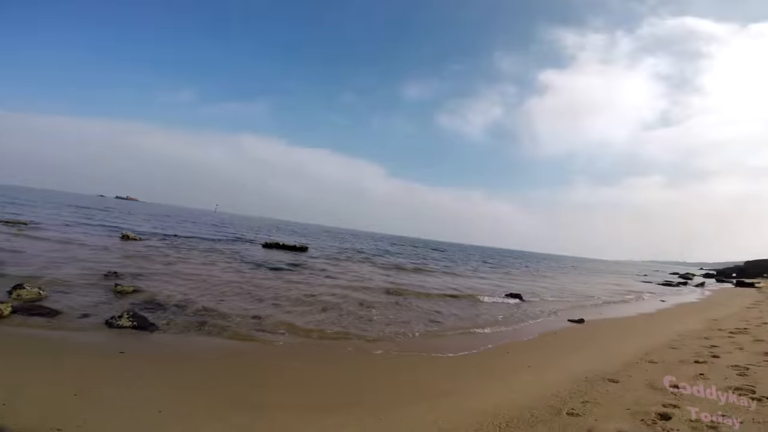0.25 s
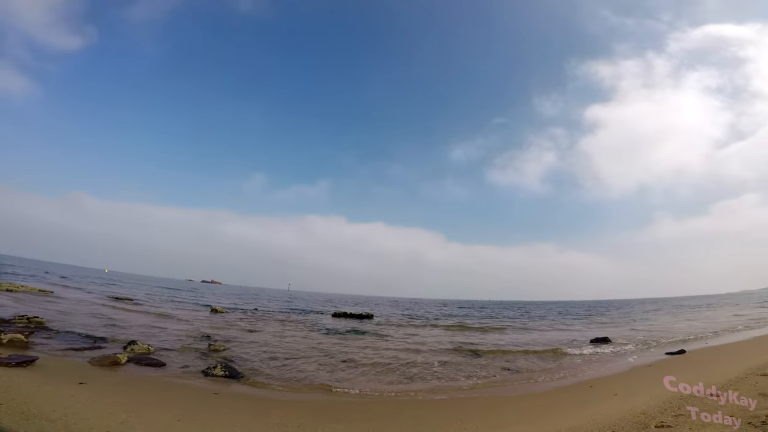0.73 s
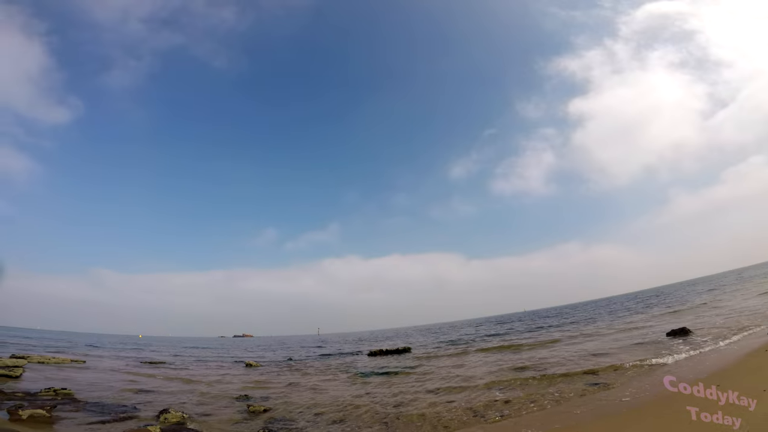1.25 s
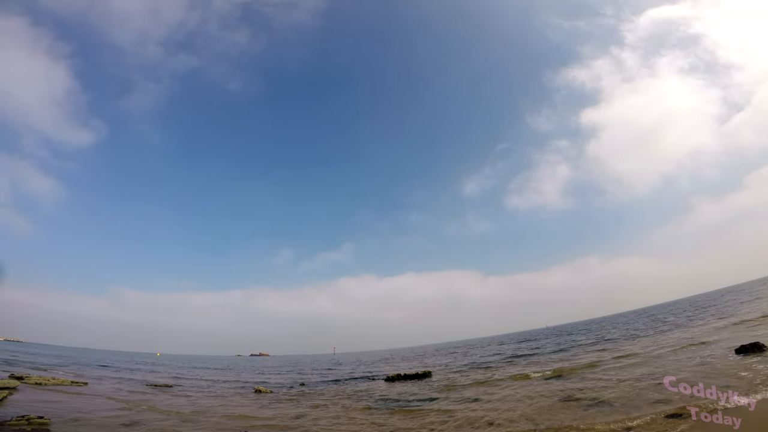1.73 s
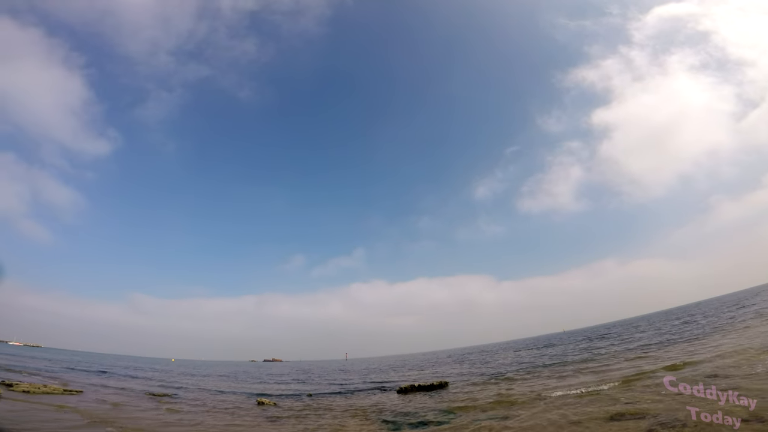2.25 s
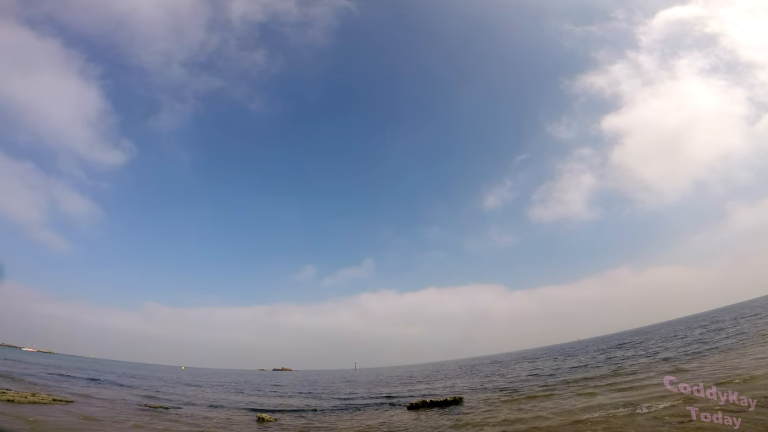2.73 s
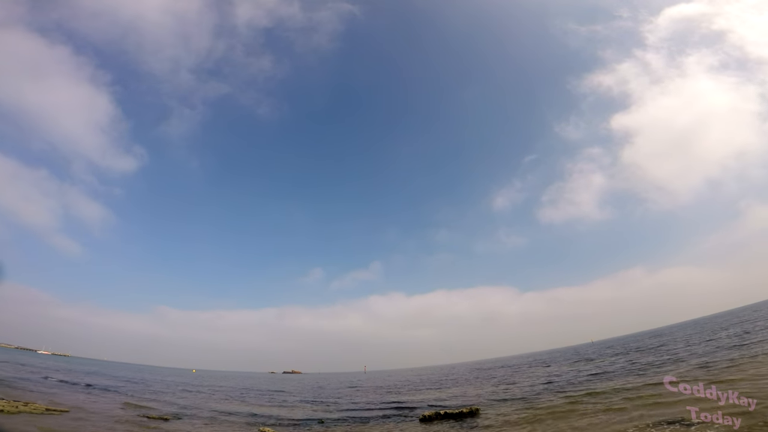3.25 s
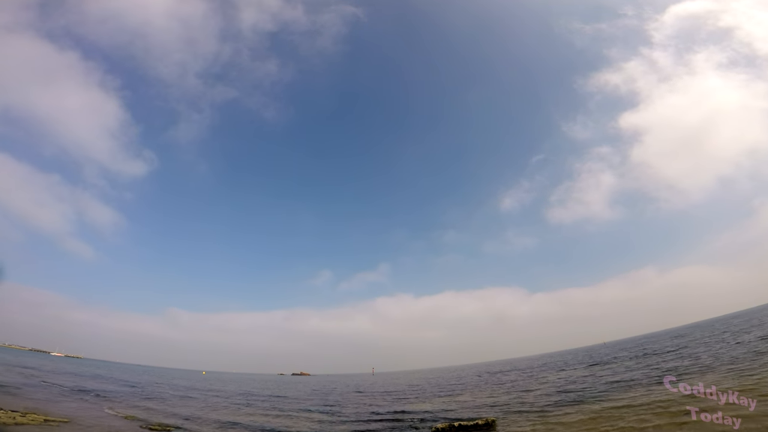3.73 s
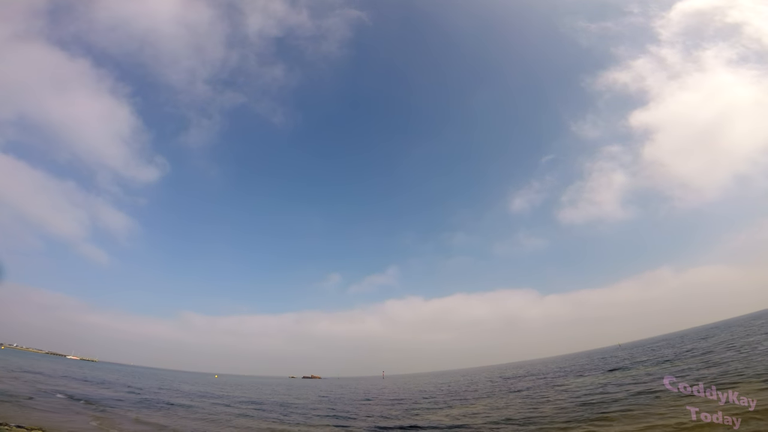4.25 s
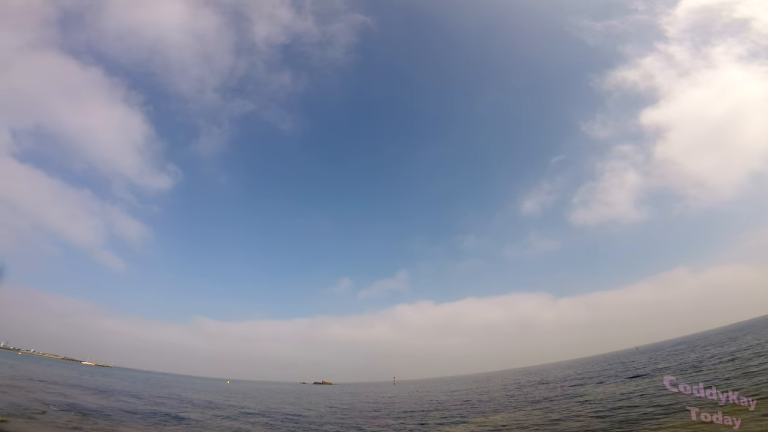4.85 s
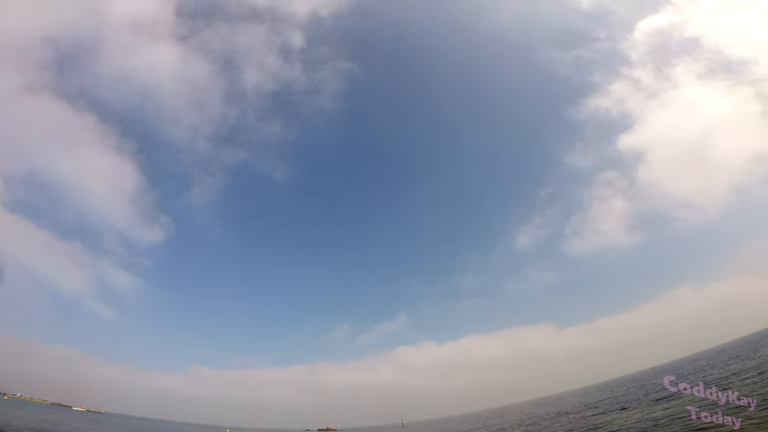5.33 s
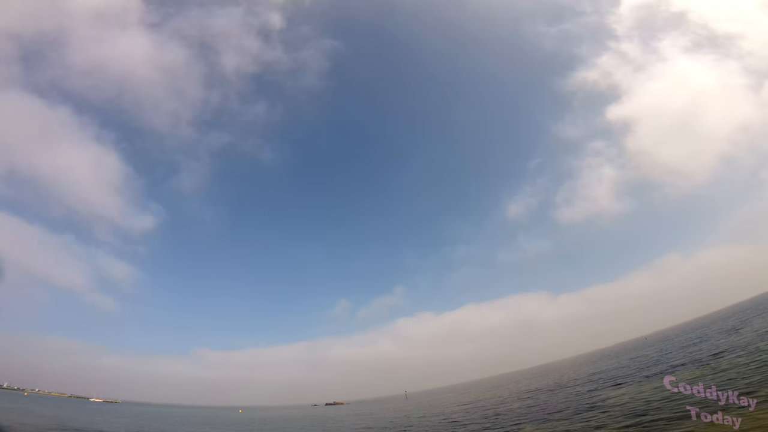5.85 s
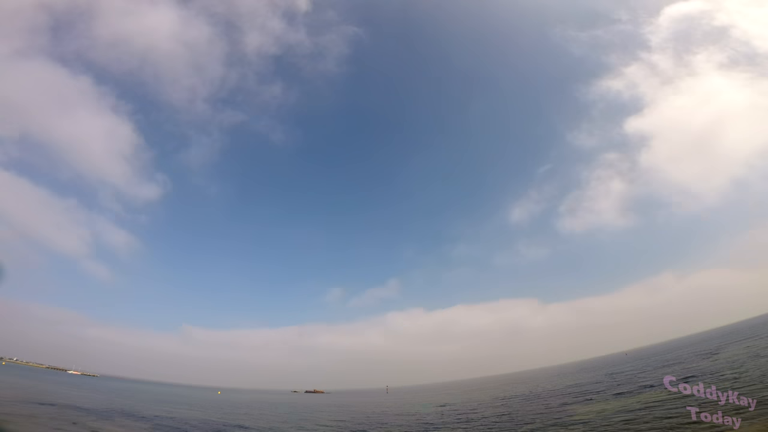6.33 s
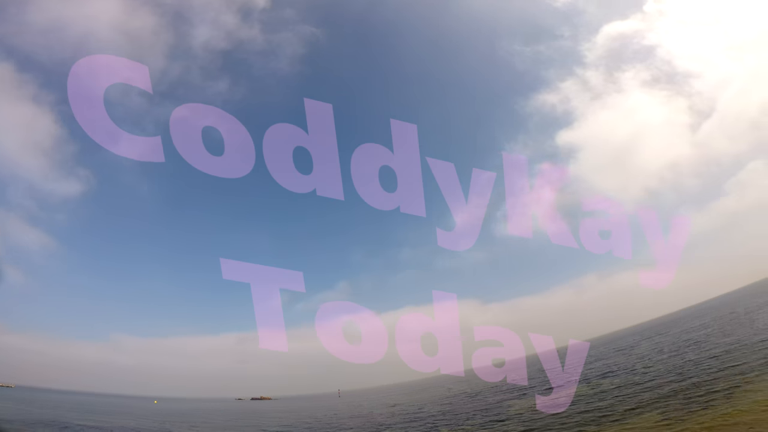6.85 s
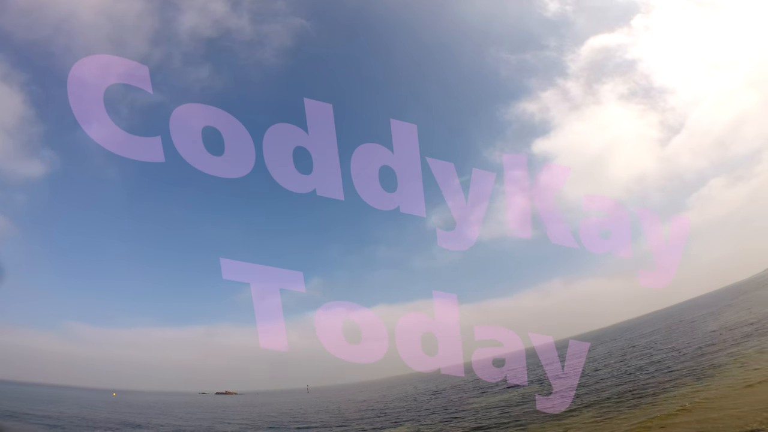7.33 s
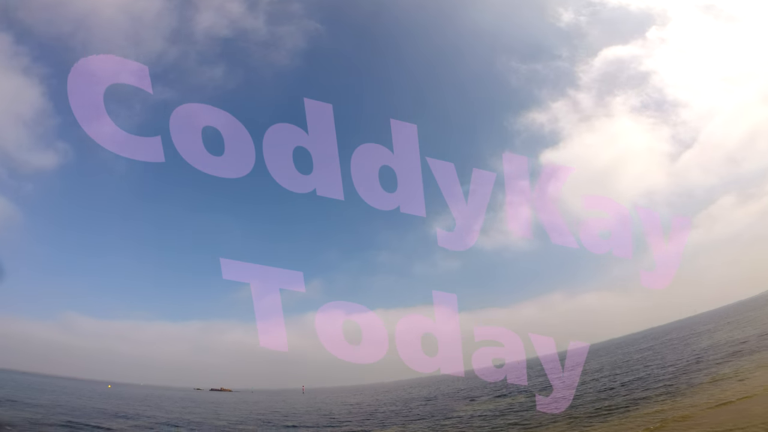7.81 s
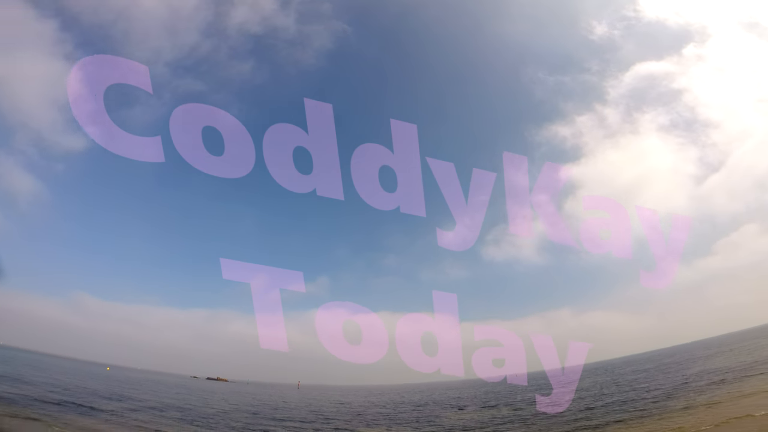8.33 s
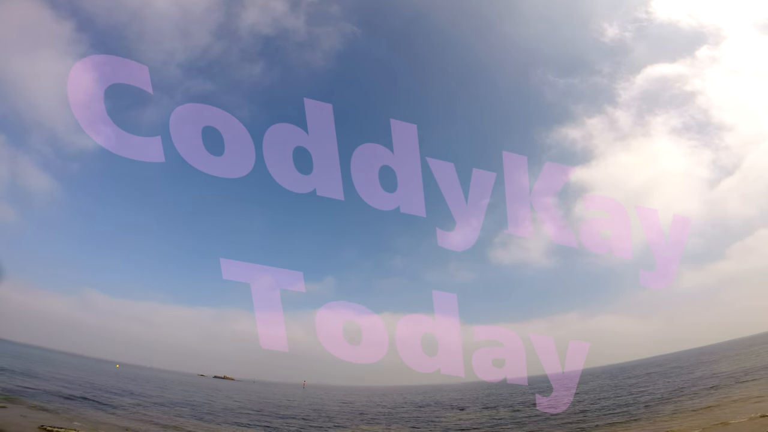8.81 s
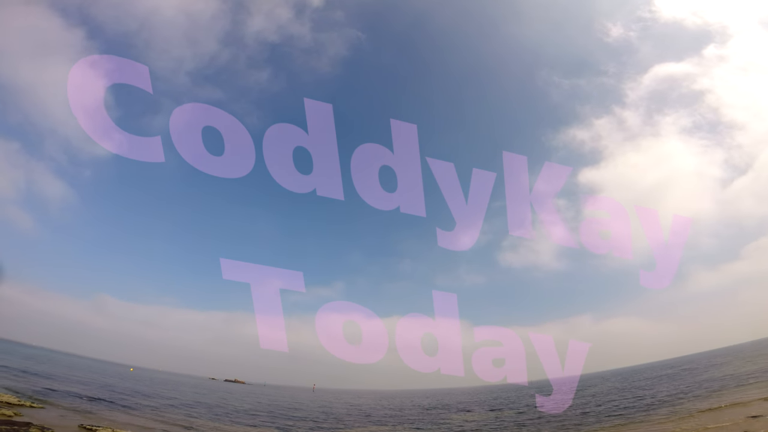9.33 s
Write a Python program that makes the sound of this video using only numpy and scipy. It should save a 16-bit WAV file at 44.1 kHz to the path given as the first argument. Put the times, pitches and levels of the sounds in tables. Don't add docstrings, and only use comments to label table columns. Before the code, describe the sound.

A small drone heard from a microphone fixed on its own frame outdoors. Four slightly detuned motors make a rough, beating low buzz with hissing propeller tips. An early deep pitch dip, then unsteady cruising, a sudden quick rev upward just past halfway, more brief dips, and a louder, windier finish with low buffeting and rattle.

```python
import sys
import numpy as np
from scipy import signal
from scipy.fft import rfft, irfft, next_fast_len
from scipy.io import wavfile
from scipy.ndimage import uniform_filter1d, map_coordinates

SR = 44100
rng = np.random.default_rng(int(sys.argv[2]) if len(sys.argv) > 2 else 0)


def output_pcm(signal):
    pcm = np.clip(np.atleast_2d(signal).T, -1, 1) * 32767
    wavfile.write(sys.argv[1], SR, np.round(pcm).astype(np.int16))


def amplitude_ratio(level_db):
    exponent = np.asarray(level_db, float) / 20
    return 10 ** exponent


N = 422478

# time in seconds, level of motors 1-4 in dB.
SHAKE = [(0, -32, -33, -47, -52), (.3, -40, -39, -46, -48), (.6, -26, -38, -44, -35),
         (2.1, -24, -38, -38, -27.5), (2.45, -20, -43, -42, -29), (3.3, -21.5, -29, -34, -30),
         (4.2, -22, -25, -30, -22.5), (5.2, -24, -25, -25, -23), (5.65, -29, -22, -23, -25),
         (6.1, -29, -28, -24, -28), (6.6, -17, -30, -26, -33), (7.05, -19, -19, -30, -38),
         (7.4, -23, -14, -24, -30), (7.8, -27, -15.5, -23, -26), (8.2, -27, -22.5, -20, -22),
         (8.9, -36, -17.5, -15, -29.5), (9.58, -35, -20, -15, -19.5)]
# time in seconds, added speed in Hz.
PUNCH = [(5.225, 0), (5.243, 11), (5.285, 63), (5.318, 98), (5.358, 110), (5.393, 94), (5.465, 25),
         (5.51, 8), (5.56, 0)]


def unit(x):
    return x / np.sqrt(np.mean(x ** 2) + 1e-20)


def curves(rows):
    time_s, *columns = np.transpose(rows)
    return np.array([np.interp(np.arange(N) / SR, time_s, column) for column in columns])


def wobble(rate_hz):
    step = np.arange(0, N + 64, 64)
    knots = rng.standard_normal(int(N * rate_hz / SR) + 4)
    coarse = map_coordinates(knots, [step * rate_hz / SR])
    return np.interp(np.arange(N), step, coarse)


def along(spectrum, hz):
    f, db = np.transpose(spectrum)
    return np.interp(np.log(hz + 1), np.log(f + 1), db, left=-120, right=-120)


def coloured(x, spectrum):
    size = next_fast_len(N + 8192)
    gain = amplitude_ratio(along(spectrum, np.fft.rfftfreq(size, 1 / SR)))
    return unit(irfft(rfft(x, size) * gain, size)[:N])


def airflow(buffet_db, wash_db, whoosh_db):
    # frequency in Hz, density in dB per Hz.
    buffet_spectrum = [(8.8, -38), (15, -9), (64, -1), (97, -1.5), (130, -6.5), (170, -29), (290, -120)]
    wash_spectrum = [(170, -23), (240, 0), (310, -5), (400, -0.5), (520, 2), (800, -51)]
    whoosh_spectrum = [(350, -36), (550, 3.5), (820, -2.5), (1090, 1.5), (1300, -4.5), (1650, -4),
                       (2300, -8.5), (3500, -16)]
    buffet = amplitude_ratio(buffet_db + 2.2 * wobble(8.4)) * coloured(rng.standard_normal(N), buffet_spectrum)
    wash = amplitude_ratio(wash_db + 3.5 + 1.5 * wobble(9)) * coloured(rng.standard_normal(N), wash_spectrum)
    whoosh = amplitude_ratio(whoosh_db + 5.0 + 0.6 * wobble(7)) * coloured(rng.standard_normal(N), whoosh_spectrum)
    return buffet + wash + whoosh


def wake():
    # middle in seconds, half length in seconds, level in dB.
    sinkings = [(0.019, 0.11, -35), (0.378, 0.076, -34), (5.62, 0.23, -30.5), (6.72, 0.17, -32),
                (8.14, .1, -34), (8.86, .15, -36), (9.56, .07, -34)]
    # frequency in Hz, density in dB per Hz.
    shudder_spectrum = [(190, -25), (240, -1.5), (285, -1), (330, -6), (400, -11), (470, -35)]
    t = np.arange(N) / SR
    strength = sum(amplitude_ratio(db) * np.exp(-((t - mid_s) / half_s) ** 2) for mid_s, half_s, db in sinkings)
    return strength * amplitude_ratio(1.9 * wobble(14)) * coloured(rng.standard_normal(N), shudder_spectrum)


def rattle():
    # frequency in Hz, density in dB per Hz.
    rattle_spectrum = [(100, -34), (125, -5), (165, 1), (215, -1), (260, -18.5)]
    drive = np.sqrt(np.sum(amplitude_ratio(curves(SHAKE)) ** 2, axis=0))
    return drive * amplitude_ratio(-8.5 + 1.7 * wobble(7.2)) * coloured(rng.standard_normal(N), rattle_spectrum)


def punch():
    added_hz = curves(PUNCH)[0]
    return added_hz / added_hz.max()


def demand():
    # time in seconds, speed of motors 1-4 in Hz.
    cruise_hz = [(0, 219, 203, 175.1, 162.9), (.7, 209.4, 196, 187.7, 178.1), (1.16, 215, 200, 190, 182),
                 (1.35, 201.3, 179.5, 174.1, 167.9), (1.7, 204, 177, 175.1, 165.6),
                 (2.42, 208.9, 186.2, 176.9, 169.8), (3.7, 200.2, 183.9, 183, 169.8),
                 (4.72, 197.4, 187.8, 181.2, 173.8), (4.8, 182.9, 175.1, 168.1, 160.5),
                 (5.22, 182, 174, 166.8, 162), (5.55, 173.5, 171.7, 163, 160.5),
                 (6.2, 170, 181.8, 166.1, 164.2), (6.8, 174.6, 179.7, 174.8, 163.2),
                 (7.16, 182, 186.4, 178.1, 166), (7.4, 189, 200.4, 188, 181),
                 (7.8, 189.5, 202.5, 188.6, 182.1), (8.65, 182, 194.2, 187, 168.5),
                 (9.58, 179.8, 195.3, 183.6, 168)]
    # middle in seconds, half length in seconds, drop in Hz,
    # extra drop per step from motor 4 to 1 in Hz, squareness exponent.
    eases = [
        (.35, .2, 36, 13, 1.8),
        (2.052, .23, 13, 0.27, 2.93),
        (6.51, .2, 17.5, -0.6, 5.93),
        (7.322, 0.071, -6, -0.5, 2.2),
        (8.28, .21, 15, -0.03, 2.4),
        (8.561, 0.0599, -3, 0.37, 2.4),
        (8.92, .13, -4, -0.5, 2.1),
    ]
    t = np.arange(N) / SR
    motor_step = np.arange(4)[::-1, None] - 3 / 2
    drop_hz = 0
    for mid_s, half_s, hz, extra_hz, square in eases:
        drop_hz = drop_hz + (hz + extra_hz * motor_step) * np.exp(-np.abs((t - mid_s) / half_s) ** square)
    drop_hz[3] += 12 * np.exp(-((t - 6.5) / 0.19) ** 6)
    return curves(cruise_hz) - drop_hz + curves(PUNCH)


def shaft_speeds(hunt, wind_rise_db):
    speed_hz = uniform_filter1d(demand(), size=SR // 70, axis=1)
    gusts = 0.0008 * amplitude_ratio(0.6996 * wind_rise_db)
    return speed_hz * (1 + np.array([hunt * wobble(22) + gusts * wobble(7) for _ in speed_hz]))


def tip_hiss(angles, level_db, chop):
    # frequency in Hz, density in dB per Hz.
    tip_spectrum = [(1100, -24), (2000, -6), (3290, -4.5), (4080, -10), (5010, 0), (5790, -8), (6540, -1),
                    (7800, -5), (9500, -6), (10300, -12), (11800, -28), (14300, -29), (15000, -38),
                    (15150, -70)]
    swell = 1 + np.clip(chop, 0, 1) * np.cos(3 * angles)
    hiss = coloured(np.sum(swell * rng.standard_normal(angles.shape), axis=0), tip_spectrum)
    gust_db = 0.22 * wobble(3.2) + 0.6 * wobble(15) + 0.76 * wobble(40)
    return amplitude_ratio(level_db - 0.5 + gust_db) * hiss


def level(rows, punch_db):
    cruise_db = curves(rows)
    return cruise_db + np.sqrt(punch()) * (np.array(punch_db)[:, None] - cruise_db)


def tone(angle, order, level_db, flutter_db, flutter_hz):
    return amplitude_ratio(level_db + flutter_db * wobble(flutter_hz)) * np.sqrt(2) * np.sin(order * (angle + order))


def rotors(speeds_hz, angles, sharp_db):
    # time in seconds, level of motors 1-4 in dB.
    blade_rows = [(0, -34.5, -54, -68, -71), (.3, -43, -60, -42, -37), (.9, -47.5, -44, -42.5, -34),
                  (2.1, -44, -46, -37.5, -29.5), (3.6, -45, -35.5, -35.5, -27.5), (4.6, -44, -39, -34, -27),
                  (5.2, -46, -35, -27, -25.5), (5.6, -32, -36, -36, -30), (6, -36, -45, -30, -26),
                  (6.3, -33, -45, -21.5, -28), (6.55, -33, -50, -25, -20.5), (7, -48, -50, -22, -31),
                  (7.4, -50, -38, -22, -44), (8.3, -38, -33, -22.5, -29), (8.8, -46, -35, -21.5, -48),
                  (9.58, -42, -31, -19, -50)]
    # time in seconds, level of motors 1-4 in dB.
    slap_rows = [(0, -48, -57, -55, -59), (.17, -52, -64, -56, -62), (.3, -60, -79, -62, -67),
                 (.6, -65, -57, -66, -61), (1.2, -60, -59, -60, -61), (1.6, -60, -65, -59, -59),
                 (2.4, -58.5, -53.5, -53.5, -59.5), (3.6, -55, -49.5, -44.5, -51),
                 (4.8, -50, -43.5, -43, -45), (5.65, -50, -49.5, -54, -64), (6.3, -47, -41.5, -42.5, -46),
                 (6.55, -48, -55, -41, -49), (6.9, -46, -39, -36, -41), (7.5, -41, -45, -37.5, -44),
                 (8.2, -41, -47, -36, -45), (8.8, -52, -45, -37, -52), (9.58, -46.5, -52, -38, -54)]
    uneven_db = [(-13.5, -19), (-34, -14), (-17, -30), (-28, -17.5)]
    # frequency in Hz, gain in dB.
    frame_gain = [(100, 0), (165, -1.5), (205, 0.5), (235, 4), (280, -1), (400, -5)]
    # frequency in Hz, gain in dB.
    case_gain = [(850, 2), (1100, 5.5), (1400, 0.2), (1750, 2), (2300, -7), (3400, -11), (4100, -21),
                 (5000, -17), (5800, -20.5), (6500, -21), (8500, -40)]
    punch_shake_db = [-22, -21, -21.5, -36]
    punch_blade_db = [-29, -37, -34, -26]
    punch_slap_db = [-41, -42, -50, -42]

    shakes_db = level(SHAKE, punch_shake_db)
    blades_db = level(blade_rows, punch_blade_db)
    slaps_db = level(slap_rows, punch_slap_db)
    out = np.zeros(N)
    for motor, (second_db, fourth_db) in enumerate(uneven_db):
        speed_hz, angle = speeds_hz[motor], angles[motor]
        shake_db = shakes_db[motor] + along(frame_gain, speed_hz)
        blade_db = blades_db[motor]
        out += tone(angle, order=1, level_db=shake_db, flutter_db=1.0, flutter_hz=22.03)
        out += tone(angle, order=2, level_db=blade_db + second_db, flutter_db=4.5, flutter_hz=29.85)
        out += tone(angle, order=3, level_db=blade_db - 0.9, flutter_db=1.27, flutter_hz=24.34)
        out += tone(angle, order=4, level_db=blade_db + fourth_db, flutter_db=2.5, flutter_hz=16)
        for k in range(6, 37, 3):
            colour_db = along(case_gain, k * speed_hz) + sharp_db * np.log2(k * speed_hz / 1000)
            out += tone(angle, order=k, level_db=slaps_db[motor] + colour_db, flutter_db=2.5, flutter_hz=29.92)
    return out


def scene():
    # time in seconds, wind pressure on the port in dB, blade load in dB,
    # slap sharpness in dB per octave above 1 kHz.
    flight = [(0, -49, -50, 1), (.3, -46, -52, 1.5), (.6, -45, -43.5, 6.5), (1.3, -46.5, -44, 4.5),
              (2.25, -38, -41.5, 4), (2.65, -41, -43, 2.5), (3.7, -38.5, -38.5, 2.6), (4.6, -42, -37.5, .4),
              (5.2, -30, -36.5, 0.5), (5.55, -37, -41, 0.5), (5.85, -37, -39, .2), (6.05, -30, -35, .1),
              (6.3, -33, -34.5, 1), (7, -29, -31.5, -1.5), (8.05, -33, -35, -1.6), (8.5, -25.5, -32, 1.5),
              (9, -26, -30, 2.3), (9.58, -30.5, -30.5, 1.84)]
    wind_db, load_db, sharp_db = curves(flight)
    wind_rise_db = wind_db + 47
    load_rise_db = load_db + 44
    full = punch()
    speeds_hz = shaft_speeds(hunt=0.003, wind_rise_db=wind_rise_db)
    start_turns = rng.random((len(speeds_hz), 1))
    angles = 2 * np.pi * (np.cumsum(speeds_hz, axis=1) / SR + start_turns)

    wash_db = np.minimum(-43 + 0.28 * wind_rise_db + 0.43 * load_rise_db, -34.5) - 5 * full
    whoosh_db = -48.5 + 0.4 * wind_rise_db + 0.52 * load_rise_db - 8 * full
    air = airflow(wind_db, wash_db, whoosh_db) + wake()
    hiss = tip_hiss(angles, load_db + 6.5 * full, chop=0.84)
    mix = air + rattle() + hiss + rotors(speeds_hz, angles, sharp_db + 6 * full)
    return mix[None]


def band_limit(x):
    return signal.sosfilt(signal.butter(12, 15660, fs=SR, output="sos"), x)


def record(dry):
    soft = dry / np.sqrt(1 + (dry / 0.78) ** 2)
    return band_limit(soft)


dry = scene()
out = record(dry)
output_pcm(out)
```